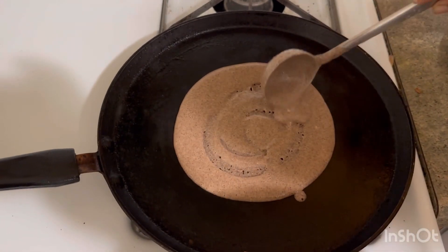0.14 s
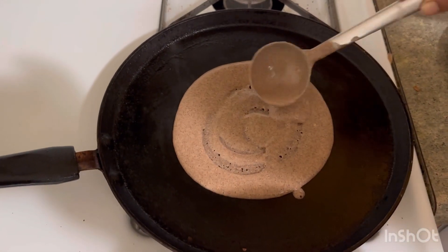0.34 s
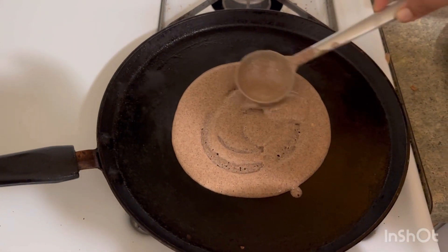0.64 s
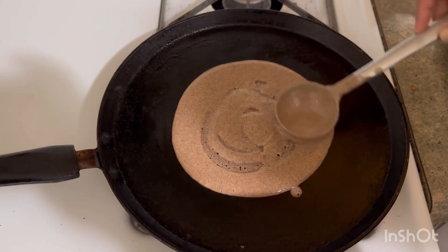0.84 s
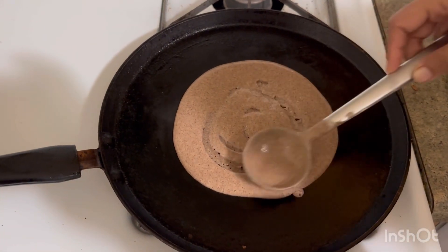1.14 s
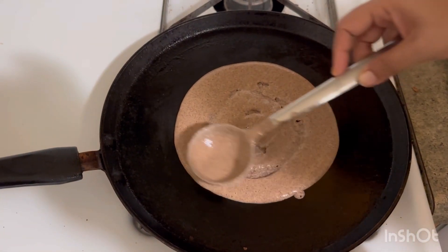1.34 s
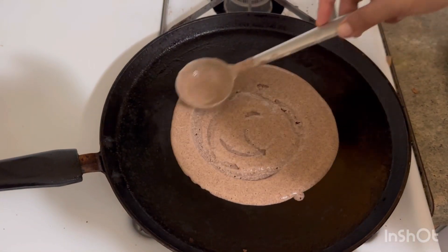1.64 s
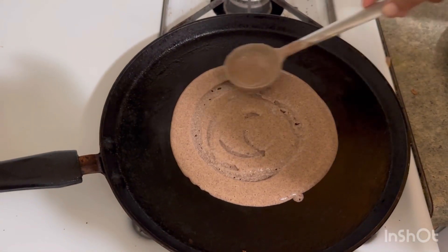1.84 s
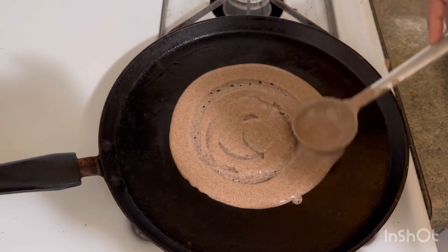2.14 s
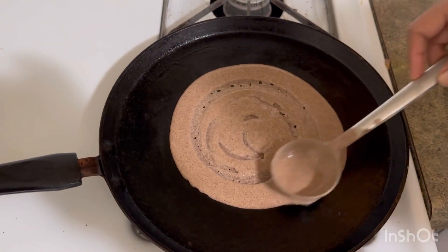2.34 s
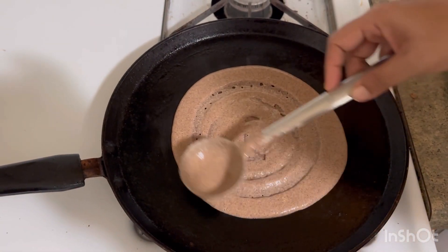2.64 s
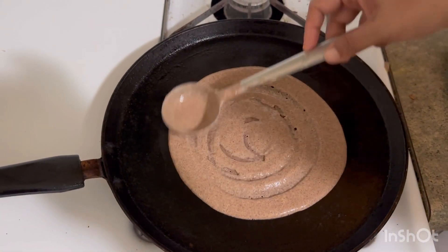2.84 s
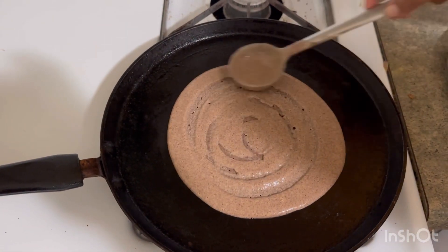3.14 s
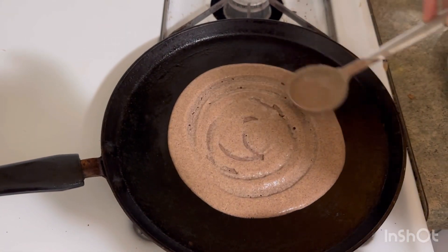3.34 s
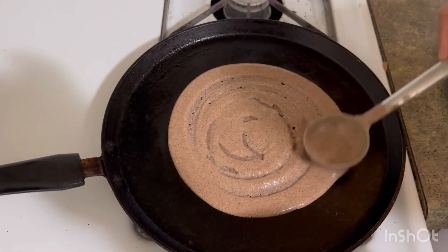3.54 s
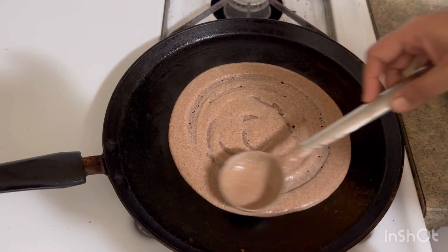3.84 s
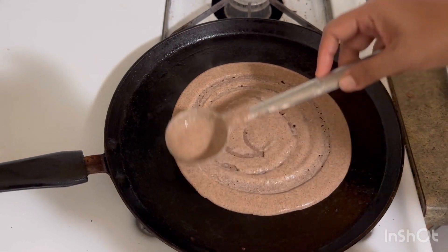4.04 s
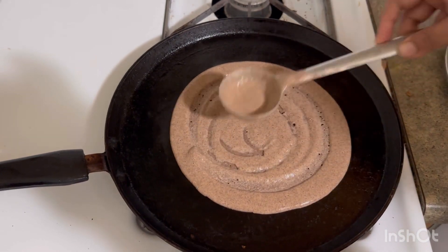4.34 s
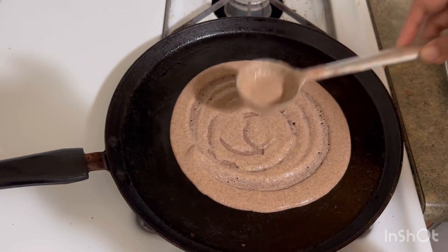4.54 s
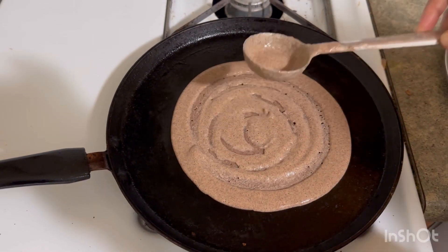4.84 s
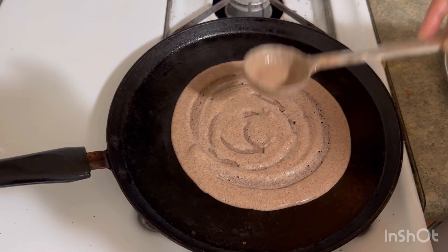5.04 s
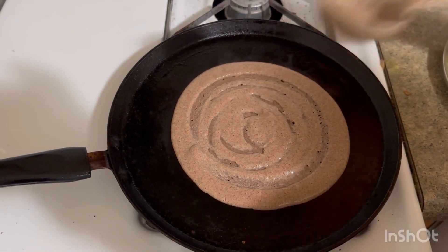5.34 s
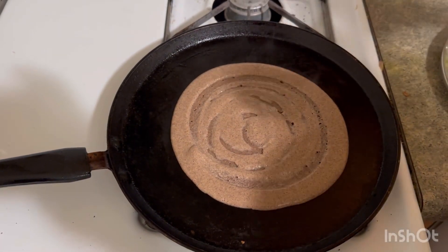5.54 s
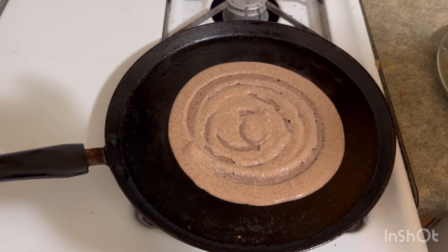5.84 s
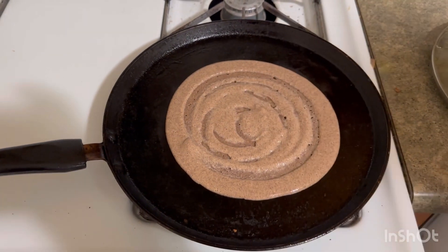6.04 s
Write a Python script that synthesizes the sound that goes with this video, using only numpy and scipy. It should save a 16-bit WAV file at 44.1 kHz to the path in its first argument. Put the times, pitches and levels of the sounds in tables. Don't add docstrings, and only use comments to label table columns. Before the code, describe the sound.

Close stereo view of a griddle in a small kitchen. Batter sizzles lightly with separate crackles, dips, then swells into dense bright fizz with snapping bubbles. Faint dull ladle rubs come and go. The fizz thins into scattered pops and near silence over a very low hum, until a steel ladle clatters sharply into a bowl at the end.

```python
import sys
import numpy as np
from scipy import signal
from scipy.fft import rfft, irfft, next_fast_len
from scipy.io import wavfile
from scipy.ndimage import uniform_filter1d

SR = 44100
rng = np.random.default_rng(int(sys.argv[2]) if len(sys.argv) > 2 else 0)


def generate_wav(signal):
    frames = np.transpose(np.atleast_2d(signal))
    scaled = np.clip(frames, -1, 1) * 32767
    pcm = np.round(scaled).astype(np.int16)
    wavfile.write(sys.argv[1], SR, pcm)


def attenuation_scalar(level_db):
    decades = np.asarray(level_db, float) / 20
    return 10 ** decades


N = 272538
SIZE = next_fast_len(N + SR // 2)
HZ = np.maximum(np.arange(SIZE // 2 + 1) * SR / SIZE, 1)
ROOM_T60_S = 0.21


def rms_one(x):
    return x / np.sqrt(np.mean(x ** 2) + 1e-20)


def in_time(rows):
    s, *columns = np.transpose(rows)
    return [np.interp(np.arange(N) / SR, s, c) for c in columns]


def in_hz(rows):
    hz, *columns = np.transpose(rows)
    return [np.interp(np.log(HZ), np.log(hz), c) for c in columns]


def shape(x, gain):
    return irfft(rfft(x, SIZE) * gain, SIZE)[..., :N]


def band(x, low_hz, high_hz):
    sos = signal.butter(2, [low_hz, min(high_hz, .45 * SR)], "band", fs=SR, output="sos")
    return signal.sosfilt(sos, x + 1e-18)


def drift(rate_hz):
    r = np.exp(-2 * np.pi * rate_hz / SR)
    noise = rng.standard_normal(N + SR)
    return rms_one(signal.lfilter([1], [1, -2 * r, r * r], noise)[SR:])


def hump(middle_s, length_s):
    return np.exp(-(2 * (np.arange(N) / SR - middle_s) / length_s) ** 2)


def ring(clicks, hz, t60_s):
    r = attenuation_scalar(-60 / (t60_s * SR))
    w = 2 * np.pi * hz / SR
    return signal.lfilter([0, np.sin(w)], [1, -2 * r * np.cos(w), r * r], clicks + 1e-18)


def decay(x, tau_s):
    return signal.lfilter([1], [1, -np.exp(-1 / (tau_s * SR))], x)


def clicks_at(seconds, heights):
    out = np.zeros(N)
    np.add.at(out, np.round(np.asarray(seconds) * SR).astype(int), heights)
    return out


# middle_s, length_s, level_db
HUM_SWELLS = [(.22, 0.081, -72), (0.62, 0.14, -64), (0.724, 0.04, -59), (0.886, 0.25, -70),
              (1.142, 0.15, -64.5), (1.315, 0.086, -64), (1.46, 0.11, -67), (1.64, 0.23, -64.5),
              (2.082, 0.55, -68), (2.442, 0.038, -69), (2.613, 0.11, -73), (2.762, 0.042, -63),
              (2.927, 0.058, -71), (3.114, .15, -68), (3.52, 0.49, -72), (3.93, 0.18, -68.5),
              (4.4, 0.71, -70), (5.0, 0.43, -63.5), (5.356, 0.36, -61.5), (5.524, 0.061, -66),
              (5.763, 0.055, -67), (5.924, 0.091, -69), (6.113, 0.16, -57)]
# freq_hz, density_db
RUMBLE_SPECTRUM = [(85, -20), (120, -21), (155, -26.5), (250, -24.5), (419, -28.5), (900, -44.5),
                   (1170, -95), (1980, -120)]


def kitchen():
    t = np.arange(N) / SR
    swell = attenuation_scalar(-89.5) + sum(attenuation_scalar(db) * hump(s, length_s) for s, length_s, db in HUM_SWELLS)
    turn = 2 * np.pi * np.cumsum(59 + 2.0 * drift(5.93)) / SR
    tone = np.sin(turn) + attenuation_scalar(-19.0) * np.sin(2 * turn)
    hum = np.sqrt(2) * swell * attenuation_scalar(2 * drift(6.8)) * tone
    whine_hz, whine_db, whine_stop_s = 415, -86.5, 5.3
    whine = np.sin(2 * np.pi * whine_hz * t + .5 * drift(2.8)) * (t < whine_stop_s)
    whine = np.sqrt(2) * attenuation_scalar(whine_db + 2.0 * drift(0.34)) * whine
    jolt_db, jolt_rise_s, jolt_fall_s = 9, 0.054, 0.15
    since_s = t - BOWL_BLOWS[0][0]
    jolt = np.clip(since_s / jolt_rise_s, 0, 1) * np.exp(-np.maximum(since_s, 0) / jolt_fall_s)
    rumble_db = -70.5 + 1.84 * drift(23.0) + jolt_db * jolt
    low_cut = (HZ > 85) + attenuation_scalar(-19.0) * (HZ <= 85) * (HZ > 42)
    rumble = shape(rng.standard_normal((3, N)), attenuation_scalar(in_hz(RUMBLE_SPECTRUM)[0]) * low_cut)
    hiss = attenuation_scalar(-74) * band(rng.standard_normal((3, N)), 800, 15000)
    return hum + whine + attenuation_scalar(rumble_db) * rms_one(rumble) + hiss


# start_s, peak_db
BOWL_BLOWS = [(6.0053, -48), (6.0098, -17.5), (6.0102, -19), (6.012, -24.5), (6.0129, -24), (6.0152, -32),
              (6.0168, -33), (6.021, -44), (6.0262, -37), (6.031, -31), (6.045, -40), (6.049, -43),
              (6.0635, -40), (6.0352, -34), (6.029, -50), (6.0367, -20.5), (6.055, -54), (6.087, -63)]
# freq_hz, level_db, t60_s
BOWL_MODES = [(2275, -4, 0.17), (2643, -19, 0.2), (3564, -13, 0.15), (3811, -18, 0.32), (5367, 1.5, .17),
              (5417, -9, .12), (5593, -8, 0.12), (5744, -17, 0.24), (6164, -11, 0.19), (6643, -10, 0.24),
              (6718, -21, 0.96), (6961, -9, 0.19), (7752, -4, 0.11), (8140, -9, 0.17), (8479, -9, 0.14),
              (8705, -5, 0.18), (8877, -12, 0.16), (9480, -24, 0.78), (9690, -19, 0.31)]
# freq_hz, level_db, t60_s
WALL_MODES = [(555, -17, .25), (615, -14, .25), (685, -10, .28), (717, -9, 0.29), (792, -14, 0.3),
              (872, -14, 0.27), (978, -13, 0.22), (1090, -14, 0.24), (1307, -9, 0.3), (1351, -5, .3),
              (1378, -9, .3), (1420, -9, 0.35), (1487, -10, .3), (1590, -14, .35), (2009, -8, 0.17),
              (4160, 11, 0.025), (4660, -5, 0.025), (5167, -14, .2), (7080, -8, .14), (10630, -18, .2)]
# freq_hz, density_db
CLATTER_SPECTRUM = [(100, -29), (250, -19), (450, -22), (720, -1), (1050, -3.5), (1400, 0), (1900, -25),
                    (3000, -14.5), (4250, -8), (5400, -7.5), (9000, -5.5), (10000, -17), (10800, -2),
                    (11500, -19), (13300, -10), (15800, -23)]


def bowl_knock():
    s, peak_db = np.transpose(BOWL_BLOWS)
    blows = clicks_at(s, attenuation_scalar(peak_db))
    chatter = decay(blows, 0.0062)
    modes = np.zeros(N)
    for hz, db, t60_s in list(BOWL_MODES) + list(WALL_MODES):
        hardness_db = 2 * (peak_db - peak_db.max()) * (hz < 2100)
        sign = rng.choice([-1, 1], len(s)) if hz > 2100 else 1
        struck = clicks_at(s, sign * attenuation_scalar(peak_db + hardness_db + rng.normal(0, 1.2, len(s))))
        drive = struck + attenuation_scalar(-26) * chatter * rng.standard_normal(N)
        modes += attenuation_scalar(db - 20) * ring(drive, hz, min(.75 * t60_s, .25))
    crack = attenuation_scalar(7.5) * decay(blows, .0013)
    tail = attenuation_scalar(-17.0) * decay(blows, 0.0071)
    wall_tail = attenuation_scalar(-29.5) * decay(blows, 0.08)
    noise = (crack + tail + wall_tail) * rng.standard_normal(N)
    clatter = shape(noise + attenuation_scalar(6) * blows, attenuation_scalar(in_hz(CLATTER_SPECTRUM)[0]))
    boom = attenuation_scalar(-28) * decay(blows, .05) * rng.standard_normal(N)
    return modes + attenuation_scalar(1.0) * clatter + band(boom, 600, 1650)


# start_s, length_s, level_db, ring_hz, thump_db
LADLE_RUBS = [(.556, 0.0098, -63.5, 2330, -90), (0.57, 0.013, -70, 2280, -68.5),
              (0.575, 0.06, -64.5, 2340, -73), (0.623, 0.016, -65, 2290, -77),
              (0.564, .045, -70, 1420, -95), (0.62, 0.026, -70, 1480, -92), (0.562, 0.012, -68, 3040, -88),
              (0.609, 0.021, -67.5, 3050, -73.5), (0.618, 0.059, -69.5, 717, -86),
              (1.07, 0.072, -65.5, 754, -71), (2.003, 0.039, -64.5, 480, -66),
              (3.057, 0.017, -65.5, 565, -65), (3.064, 0.09, -71, 238, -65),
              (3.531, 0.096, -68.5, 328, -78), (3.901, 0.11, -67.5, 1030, -88),
              (5.118, 0.048, -80, 1500, -72), (5.462, .012, -80, 1060, -85), (5.495, 0.013, -70, 1160, -71),
              (5.513, 0.016, -71, 1050, -67.5), (5.532, 0.015, -75, 1500, -64.5),
              (5.514, 0.045, -71.5, 2530, -78), (5.585, 0.19, -76.5, 470, -86),
              (5.706, 0.062, -88, 422, -83), (5.536, .19, -72.5, 300, -71.5),
              (5.654, 0.015, -83, 2020, -76), (5.77, 0.021, -84, 750, -77), (5.921, 0.021, -75, 555, -91)]


def ladle_rubs():
    tail_n = 2000
    out = np.zeros(N)
    for s, length_s, db, hz, thump_db in LADLE_RUBS:
        i, n = round(s * SR), round(length_s * SR)
        stroke = np.sin(np.pi * np.linspace(0, 1, n) ** .6) ** .8
        rough = np.pad(rng.standard_normal((2, n)) * stroke, ((0, 0), (0, tail_n)))
        t60_s = min(35.0 / hz, 0.065)
        rub = rms_one(ring(rough[0], hz, t60_s)) + .4 * rms_one(band(rough[0], 500, 3600))
        thump = rms_one(band(rough[1], 41, 320))
        out[i:i + n + tail_n] += attenuation_scalar(db) * rub + attenuation_scalar(thump_db) * thump
    return out


def ladle_press():
    press_s = 0.079
    return np.max([hump(s + length_s / 2, 2 * press_s) for s, length_s, *_ in LADLE_RUBS], axis=0)


# start_s, peak_db, dull_db
LONE_BUBBLES = [(0.0695, -46, -56), (0.0812, -38, -59), (0.1124, -32, -65), (0.1224, -42, -58),
                (0.1494, -34, -57), (0.1854, -41, -51), (0.197, -34, -65), (0.2297, -33, -54),
                (0.2362, -36, -69), (0.2602, -36, -63), (0.2986, -41, -54), (.314, -32, -51),
                (0.382, -44, -60), (.414, -41, -52.5), (.4538, -34, -57), (0.465, -37, -67),
                (0.492, -46, -60), (.4962, -30, -55), (0.5144, -39, -61), (0.5628, -31.5, -60),
                (0.6297, -38, -53), (0.6803, -48, -69), (.692, -47, -68), (.7086, -56, -66),
                (0.7286, -40, -66), (0.7551, -38, -55), (0.781, -40, -49.5), (0.796, -48, -49.5),
                (3.84, -28, -50), (3.9514, -27, -61), (4.0716, -29, -60), (4.1024, -29, -66),
                (4.1415, -30, -54), (4.156, -26.5, -63), (4.161, -34, -53), (4.2053, -36, -54),
                (4.2274, -30.5, -54), (4.2425, -41, -51.5), (4.277, -36, -61), (4.306, -35, -55),
                (4.325, -31, -60), (4.428, -33.5, -54), (4.471, -42, -57), (4.534, -46.5, -75),
                (4.572, -39, -60), (4.6409, -42, -84), (4.699, -43, -60), (4.71, -40, -59),
                (4.8793, -52, -64), (4.9, -48.5, -59.5), (5.123, -43, -63), (5.1725, -43, -63),
                (5.2212, -45.5, -66), (5.249, -53, -65), (5.4596, -51, -67), (5.6292, -48, -64),
                (5.777, -49, -73), (5.8133, -57, -82)]
# start_s, peak_db, dull_db
DENSE_BUBBLES = [(0.9285, -37, -56), (1.061, -32, -54), (1.1636, -37, -55), (1.1678, -31, -65),
                 (1.2, -41, -57), (1.2312, -32, -54), (1.241, -29, -56), (1.3124, -25, -51),
                 (1.3212, -33, -43), (1.3314, -33, -57), (1.3876, -30, -55), (1.409, -46, -53),
                 (1.4134, -27, -52), (1.4606, -31, -58), (1.508, -48, -48), (1.5187, -35, -49),
                 (1.526, -34, -55), (1.5738, -39, -48), (1.9133, -38, -45), (1.944, -40, -51),
                 (1.9784, -31, -54), (1.999, -34, -44), (2.077, -41, -61), (2.1199, -40, -52),
                 (2.1378, -42, -53), (2.202, -41, -63), (2.204, -46, -53), (2.247, -31, -43),
                 (2.26, -34, -48), (2.3856, -48, -51), (2.4978, -41, -57), (2.515, -32, -51.5),
                 (2.5236, -39, -44), (2.5389, -27, -50), (2.632, -31, -51), (2.6784, -33, -45),
                 (2.6956, -32, -55), (2.9092, -30, -44), (2.999, -29, -51), (3.0026, -40, -54),
                 (3.056, -34, -39), (3.167, -40, -50), (3.2734, -45, -42.5), (3.282, -38, -47),
                 (3.3697, -31, -49), (3.3749, -35, -63), (3.4011, -29, -50), (3.472, -41, -46),
                 (3.511, -32, -42), (3.5818, -45, -53.5), (3.7076, -50, -40), (3.7344, -57, -45),
                 (3.7475, -53, -43), (3.7872, -47, -54), (3.8108, -41, -56)]


def bubble_pops():
    dense = np.array(DENSE_BUBBLES) + [0, 3, -4]
    s, peak_db, dull_db = np.vstack([LONE_BUBBLES, dense]).T
    sign = rng.choice([-1, 1], len(s))
    snap = clicks_at(s + .001, sign * attenuation_scalar(peak_db + 8.5))
    spray = decay(clicks_at(s + 0.0021, attenuation_scalar(peak_db - 10.0)), 0.0027) * rng.standard_normal(N)
    puff = clicks_at(s + 0.00104, sign * attenuation_scalar(dull_db + 28.5))
    return band(snap + spray, 6400, 19000) + band(puff, 1170, 4100)


# time_s, level_db
BOIL_VIGOUR = [(0, -58), (.33, -64.5), (.43, -69), (.63, -66.5), (.70, -72.5), (.75, -64), (.8, -59.5),
               (.98, -53.5), (1.25, -53.5), (1.9, -54), (2.75, -52.5), (3.86, -55), (4.09, -58.5),
               (4.29, -65.5), (4.55, -69), (5.0, -77), (5.5, -76.5), (6.0, -77)]
# middle_s, length_s, dull_db, bright_db, top_db
BATTER_PUSHES = [(0.04, 0.24, 3, 1.5, 0.5), (0.404, 0.32, -3, -1, 4.5), (0.797, 0.066, -4, 1, -8),
                 (1.076, 0.069, 3.5, 0, 3.5), (1.686, 0.5, 2, 3, 4.5), (2.242, 0.28, 1.5, -1.5, -2),
                 (3.018, 0.37, 0.5, 3, 3.5), (3.49, 0.34, 0, 0.5, 0), (4.046, 0.2, 0, 1, 1),
                 (4.493, 0.2, 3, 1, -2), (5.296, 0.43, -12, -0.5, 9), (5.522, 0.093, 14, 5.5, 2),
                 (5.814, 0.34, -6.5, 1, 11)]
# freq_hz, density_db
STEAM_SPECTRUM = [(300, -18), (700, -10), (1100, -5), (1600, -2.5), (2600, -3.5), (4500, -5), (6200, -3),
                  (9000, -2.5), (11000, 0), (13000, -1), (15600, -0.5)]
# freq_hz, width_hz, gain_db
GRIDDLE_MODES = [(1500, 250, 3), (2120, 120, 2), (2800, 300, -2), (3220, 150, 5.5), (4130, 110, 6.5),
                 (6100, 400, 2), (8500, 500, 2)]
# delay_s, level_db
PAN_ECHOES = [(.0047, -17), (.0083, -17), (.0131, -16), (.0197, -16)]


def bubble_fizz(level_db):
    per_s = 9000 * attenuation_scalar(.9 * (level_db - level_db.max()) + 3.0 * drift(56))
    born = rng.random(N) < per_s / SR
    heights = attenuation_scalar(4.3 * np.minimum(rng.exponential(1, N), 3.2))
    bursts = born * heights * rng.choice([-1, 1], N)
    bursts = bursts / np.sqrt(uniform_filter1d(bursts ** 2, size=4001) + 0.00082)
    pitches_hz = np.geomspace(700, 16000, 16)
    dealt = rng.integers(0, 16, N)
    fizz = sum(ring(bursts * (dealt == k), hz, 2.2 / hz) * hz for k, hz in enumerate(pitches_hz))
    flatten = uniform_filter1d(np.abs(rfft(fizz, SIZE)) ** 2, size=1500) ** -.5
    return rms_one(shape(fizz, flatten * (HZ > 200)))


def sizzle():
    level_db, = in_time(BOIL_VIGOUR)
    vigour_db = level_db - np.median(level_db)
    dull_db, bright_push_db, top_push_db = sum(
        np.outer(colour_db, hump(s, length_s)) for s, length_s, *colour_db in BATTER_PUSHES)
    low_db = dull_db - 0.11 * vigour_db + 1.5 * ladle_press() + drift(10)
    bright_db = bright_push_db + 0.07 * vigour_db + 0.29 * drift(10)
    top_db = top_push_db + 0.25 * vigour_db + .7 * drift(10)

    fizz = bubble_fizz(level_db)
    steam = attenuation_scalar(1.04 * drift(19)) * rng.standard_normal((3, N))
    direct = rms_one(fizz + attenuation_scalar(1.5) * steam[0])
    source = np.vstack([direct, rms_one(steam[1:])])

    iron = 1 + sum((attenuation_scalar(db) - 1) / (1 + (2 * (HZ - hz) / width_hz) ** 2)
                   for hz, width_hz, db in GRIDDLE_MODES)
    walls = 1 + sum(attenuation_scalar(db) * np.exp(-2j * np.pi * HZ * delay_s) for delay_s, db in PAN_ECHOES)
    colour = attenuation_scalar(in_hz(STEAM_SPECTRUM)[0]) * iron * walls
    low = 1 / (1 + (HZ / 1900) ** 4)
    top = 1 / (1 + (11500 / HZ) ** 8)
    bright = 1 / (1 + (5000 / HZ) ** 8) - top

    body = shape(source, colour * (1 - low - bright - top))
    scale = attenuation_scalar(level_db) / np.std(body)
    lows = attenuation_scalar(low_db - np.median(low_db)) * shape(source, colour * low)
    brights = attenuation_scalar(bright_db - np.median(bright_db)) * shape(source, colour * bright)
    tops = attenuation_scalar(top_db - np.median(top_db)) * shape(source, colour * top)
    rim_gain = attenuation_scalar(np.maximum(bright_push_db, 0)) - 1
    rim = rim_gain * shape(source, colour * np.exp(-(HZ - 6500) ** 2 / 1300.0 ** 2))
    return scale * (body + lows + brights + tops + rim)


def room(x, t60_s):
    t = np.arange(SR // 2) / SR
    cloud = rng.standard_normal((2, len(t))) * attenuation_scalar(-60 * t / t60_s) * (t > .001)
    cloud = rfft(cloud, SIZE)
    cloud = cloud / np.sqrt(uniform_filter1d(np.abs(cloud) ** 2, size=1200))
    return np.vstack([x, shape(x, cloud)])


# freq_hz, likeness (0-1), griddle_right_lead_rad, counter_right_lead_rad, left_louder_db
PORT_PAIR = [(60, 0.97, 1, 0, -0.5), (300, 0.7, -0.5, .8, -1), (860, 0.63, -0.26, 1.5, 2),
             (1500, 0.52, 0.92, 3.1, -0.5), (2080, 0.86, 1, 6.2, -0.5), (3050, 0.3, 0.32, 4.5, 0.5),
             (4480, 0.77, 1.12, 6.4, 1), (5630, 0.61, -1.94, 4.2, 6), (6480, 0.7, 2, 6.2, -2.5),
             (7220, 0.3, -2, 4.8, 6), (8130, 0.98, -6, 6.8, 0)]
PORT_PAIR_TOP = [(9600, .75, -4.7, 7.9, 0), (10400, .88, -3.8, 9.0, 0), (11890, .92, -2.84, 9.6, 0),
                 (12300, .84, -2.17, 10, 0), (12800, .75, -1.3, 10.7, 0), (13700, .93, -.3, 12.4, 0),
                 (15000, .93, .2, 12.7, 0), (15700, .7, .9, 12.7, 0)]


def ports(sound, column, right_db=0):
    table = in_hz(list(PORT_PAIR) + list(PORT_PAIR_TOP))
    alike = np.clip(table[0], 0, 1)
    lead_rad = table[column] * np.minimum(HZ / 400, 1)
    left_db = table[-1] - right_db * np.exp(-np.log(HZ / 905) ** 2)
    side = np.array([[1], [-1]])
    balance = attenuation_scalar(left_db / 2 * side)
    direct = shape(sound[0], np.sqrt(alike) * np.exp(-.5j * lead_rad * side) * balance)
    return direct + shape(sound[1:], np.sqrt(1 - alike) * balance)


def scene():
    near = sizzle() + kitchen() + room(bubble_pops() + ladle_rubs(), ROOM_T60_S * 0.5)
    far = room(bowl_knock(), ROOM_T60_S)
    return ports(near, column=1) + ports(far, column=2, right_db=3.5)


def mute_weak_bands(x):
    hop, grid = 1024, 311
    both = np.pad(np.array([x[0] + x[1], x[0] - x[1]]) / 2, ((0, 0), (hop - grid, 0)))
    window = np.sin(np.pi * (np.arange(2 * hop) + .5) / (2 * hop))
    z = signal.stft(both, window=window, nperseg=2 * hop, noverlap=hop)[2]
    edges = np.r_[0, 80:96:8, 96:144:12, 144:176:16, 176:216:20, 216:264:24, 264:320:28, 320:hop:32]
    edges_hz = edges * SR / (2 * hop)
    power = np.add.reduceat(np.abs(z) ** 2, edges, axis=1)
    weak_db = np.where(edges_hz < 8000, -4.5, -7)
    weak = power < power[::-1] * attenuation_scalar(2 * weak_db)[:, None]
    weak[:, 0] = False
    slices = uniform_filter1d(np.diff(both[1]) ** 2, size=128)[::128]
    jump = slices / (uniform_filter1d(slices, size=16, origin=7) + 1e-18)
    frames = z.shape[2]
    attack = np.pad(jump, (4, 8 * frames))[:8 * frames].reshape(-1, 8).max(axis=1)
    keep = ~weak | (attack > 4.1)
    keep[:, edges_hz > 15800] = attack > 9
    keep = np.repeat(keep, np.diff(np.r_[edges, hop + 1]), axis=1)
    back = signal.istft(z * keep, window=window, nperseg=2 * hop, noverlap=hop)[1]
    mid, side = back[:, hop - grid:hop - grid + N]
    return np.array([mid + side, mid - side])


def roll_off(x):
    return signal.sosfilt(signal.butter(12, 17010, fs=SR, output="sos"), x)


def record(dry):
    cut = signal.sosfilt(signal.cheby2(16, 60, 17000, fs=SR, output="sos"), dry)
    mix = mute_weak_bands(cut)
    return roll_off(mix)


dry = scene()
out = record(dry)
generate_wav(out)
```